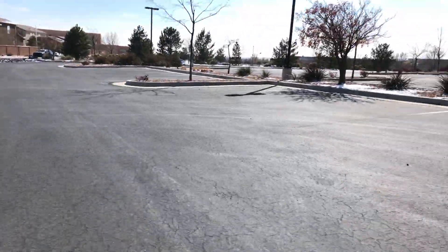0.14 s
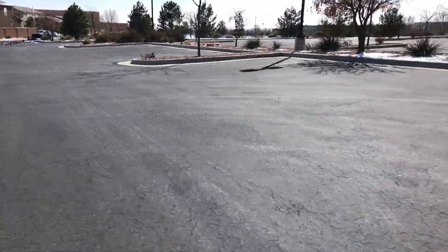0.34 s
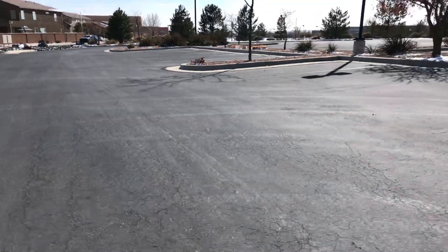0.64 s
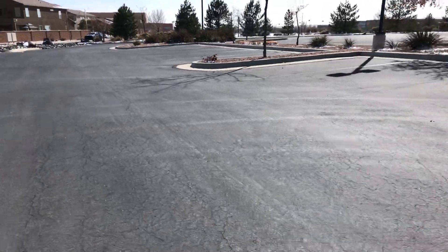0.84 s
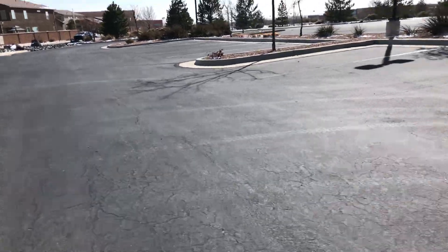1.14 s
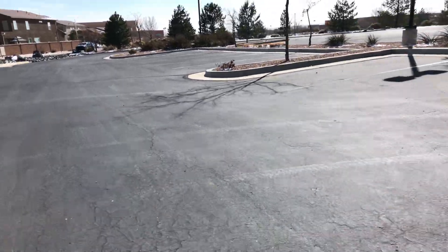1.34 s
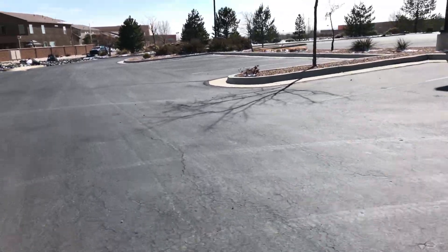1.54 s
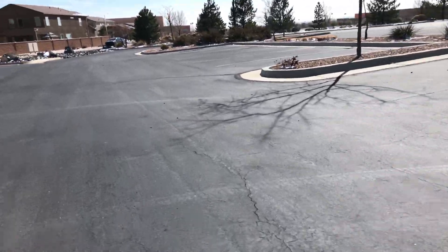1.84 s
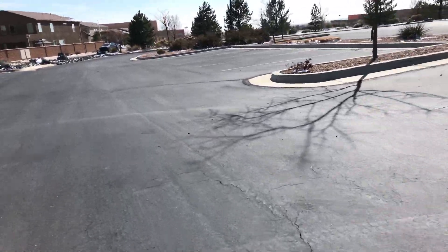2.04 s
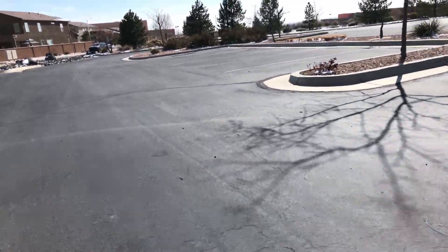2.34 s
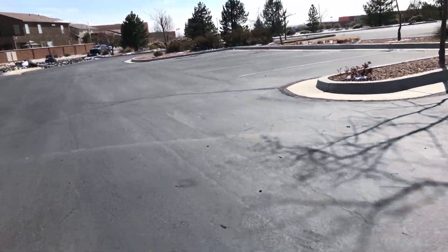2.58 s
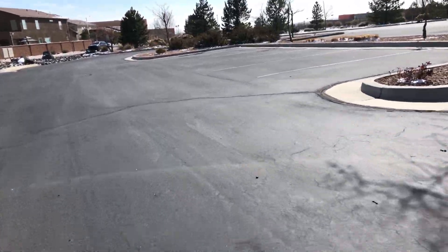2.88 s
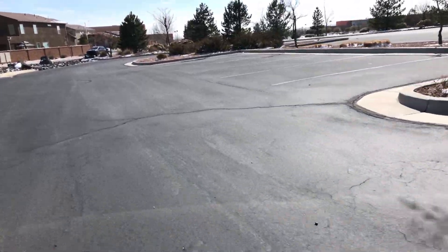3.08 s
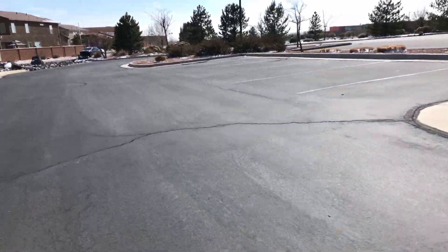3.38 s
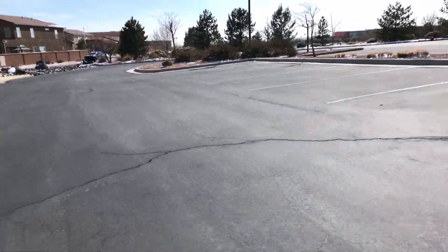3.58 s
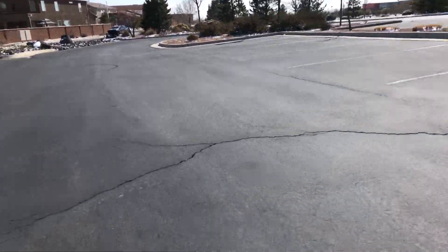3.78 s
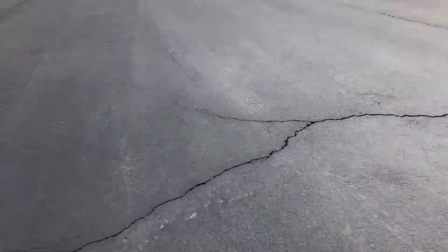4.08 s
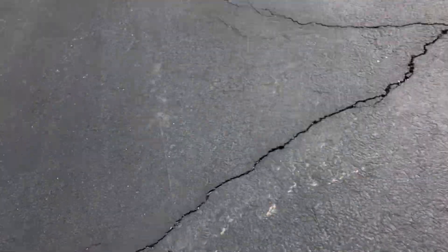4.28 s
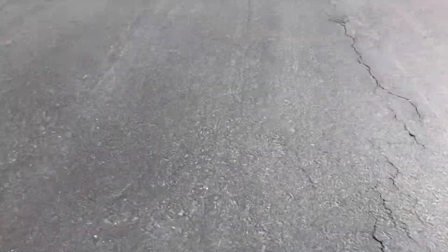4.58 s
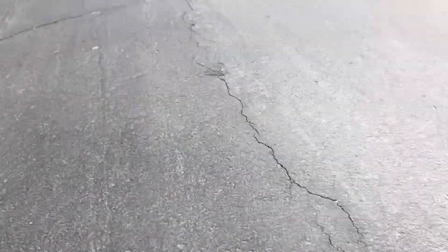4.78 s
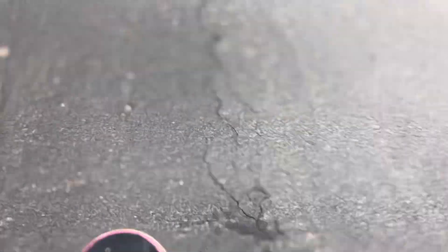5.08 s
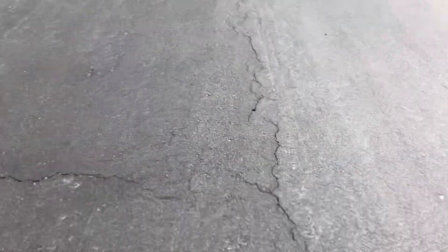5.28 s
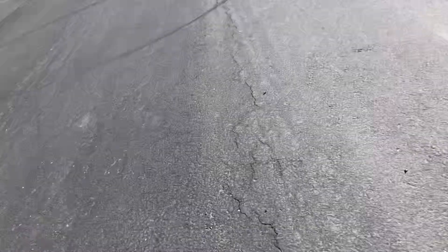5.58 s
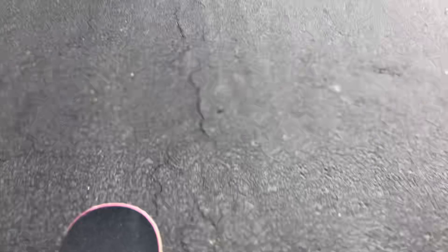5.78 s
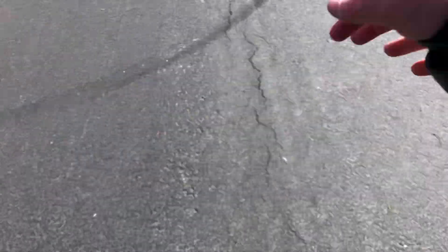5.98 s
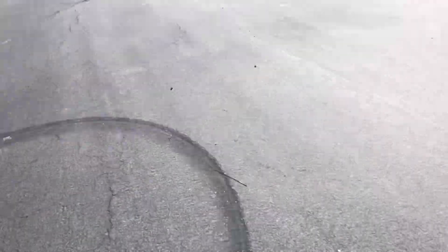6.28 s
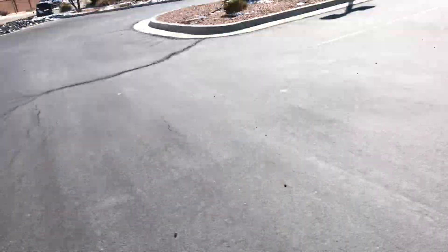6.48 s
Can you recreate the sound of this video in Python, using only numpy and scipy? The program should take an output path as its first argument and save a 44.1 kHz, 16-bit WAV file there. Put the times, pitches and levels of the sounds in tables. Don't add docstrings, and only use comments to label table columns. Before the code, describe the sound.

Skateboard wheels rumble continuously over coarse asphalt with a droning wooden deck, rattling trucks, crack knocks and wind buffeting, turning louder and brighter near four seconds.

```python
import sys
import numpy as np
from scipy import signal
from scipy.io import wavfile
from scipy.ndimage import uniform_filter1d, minimum_filter1d

SR = 44100
rng = np.random.default_rng(int(sys.argv[2]) if len(sys.argv) > 2 else 0)


def dump(signal):
    limited = np.clip(np.atleast_2d(signal).T, -1, 1)
    pcm = np.round(limited * 32767).astype(np.int16)
    wavfile.write(sys.argv[1], SR, pcm)


def attenuation_scalar(level_db):
    decades = np.asarray(level_db, float) / 20
    return 10 ** decades


N = 292383


def rms_one(x):
    return x / np.sqrt(np.mean(x ** 2) + 1e-20)


def in_time(rows):
    s, *columns = np.transpose(rows)
    return [np.interp(np.arange(N) / SR, s, c) for c in columns]


def humps(rows):
    t, out = np.arange(N) / SR, np.zeros((len(rows[0]) - 2, N))
    for s, length_s, *values in rows:
        near = slice(max(int((s - length_s / 2) * SR), 0), int((s + length_s / 2) * SR))
        out[:, near] += np.outer(values, np.cos(np.pi * (t[near] - s) / length_s) ** 2)
    return out


def drift(rate_hz):
    r = np.exp(-16 * np.pi * rate_hz / SR)
    slow = signal.lfilter([1], [1, -2 * r, r * r], rng.standard_normal(N // 8 + 4002))[4000:]
    return np.interp(np.arange(N) / 8, np.arange(len(slow)), rms_one(slow - slow.mean()))


def resonance(x, hz, width_hz, count=1):
    r = np.exp(-np.pi * width_hz / SR)
    top = (1 - r * r) / 2
    section = [top, 0, -top, 1, -2 * r * np.cos(2 * np.pi * hz / SR), r * r]
    return signal.sosfilt([section] * count, x)


def microphone_hiss():
    return attenuation_scalar(-70) * rng.standard_normal(N)


# middle in seconds, length in seconds, level in dB over calm air.
GUSTS = [(0.215, 0.063, 9), (0.369, 0.23, 14), (0.663, 0.082, 13), (0.998, 0.48, 8.5), (1.202, 0.24, 7),
         (1.437, 0.28, 9.5), (1.726, 0.44, 5), (1.946, 0.57, 8), (2.13, 0.24, 3.5), (2.285, 0.19, 7.5),
         (2.589, 0.2, 4), (3.417, 0.15, 5), (3.996, 0.039, 13.5), (4.21, 0.44, 11), (4.405, 0.12, 6.5),
         (4.605, 0.071, 12), (4.714, 0.45, 6), (4.814, 0.059, 10), (5.213, 0.26, 6), (5.498, 0.5, 12.5),
         (5.827, 0.085, 10.5), (5.892, 0.18, 9), (5.966, 0.13, 6), (6.151, 0.7, 9.5), (6.39, 0.09, 10.5),
         (6.585, 0.28, 10.5), (.33, 0.089, 4), (.4, 0.064, 0), (1.029, 0.056, 6.5), (1.962, 0.068, 8.5),
         (3.01, .06, 8.5), (4.13, 0.12, 5.5), (4.306, 0.025, 11.5), (5.243, 0.037, 10.5),
         (6.217, 0.056, 6.5), (6.584, 0.043, 9)]


def wind():
    wind_db = -36 + 1.146 * humps(GUSTS)[0]
    band = signal.butter(2, [50, 205], "band", fs=SR, output="sos")
    eddies = signal.sosfilt(band, rng.standard_normal(N))
    eddies = eddies / uniform_filter1d(eddies ** 2, size=2600) ** 0.6
    return rms_one(eddies) * attenuation_scalar(wind_db + 2.25 * drift(47.0))


def moving_band(rows, rest_db, from_s, width_hz, impacts, bounce):
    hz, = in_time([(s, hz) for s, _, hz, _ in rows])
    level_db = rest_db + humps(rows)[1]
    force = rms_one(impacts * rng.standard_normal((2, N))) + rng.standard_normal((2, N))
    slow = signal.sosfilt(signal.butter(3, width_hz, fs=SR, output="sos"), force)
    turn = 2 * np.pi * np.cumsum(hz) / SR
    band = rms_one(slow[0] * np.cos(turn) + slow[1] * np.sin(turn))
    fade_in = np.clip((np.arange(N) / SR - from_s) / 0.26, 0, 1)
    return fade_in * attenuation_scalar(level_db + 2.0 * bounce) * band


# middle in seconds, length in seconds, centre in Hz, level in dB over rest.
GLINTS = [
    (.08, .25, 10000, 6),
    (.28, .3, 11000, 8),
    (.43, 0.11, 12800, 7),
    (4.05, .5, 11500, -10),
    (4.45, .12, 12000, 9),
    (5.2, .14, 11500, 12),
    (5.84, .1, 11000, 16),
    (6.3, .3, 12000, 8),
]


def glints(road, bounce):
    return moving_band(GLINTS, -60.5, -.3, 1200, road, bounce)


# middle in seconds, length in seconds, ridge in Hz, level in dB over rest.
RIDGES = [(.22, .2, 7700, 18), (4.27, .1, 6520, 14), (4.46, .12, 6230, 17), (4.8, .3, 7000, 13),
          (5.2, .1, 6300, 16), (5.42, .25, 6180, 18), (5.65, 0.16, 7300, 15), (5.85, .1, 8250, 19),
          (6.07, 0.13, 8750, 15), (6.2, .1, 9000, 21), (6.33, .2, 6940, 19), (6.46, .12, 8850, 19)]


def thumb_ridges(road, bounce):
    return moving_band(RIDGES, -62, -.3, 300, road, bounce)


# middle in seconds, length in seconds, gap in Hz, level in dB over rest.
CHINKS = [(.36, .06, 3900, 13), (3.78, .12, 4300, 19), (3.88, .12, 4400, 8), (3.98, 0.16, 4500, 21),
          (4.2, 0.23, 4200, 23), (4.28, .08, 4400, 18), (4.42, 0.2, 4290, 21), (4.73, .04, 3350, 17),
          (4.9, 0.24, 3450, 27), (5.215, .04, 4900, 22), (5.23, .03, 4000, 24), (5.563, .03, 2420, 28),
          (5.76, .05, 4300, 29), (5.83, .07, 2900, 27), (6.03, 0.21, 4400, 22), (6.08, .04, 6100, 15),
          (6.36, .03, 2000, 20)]


def finger_gaps(road, bounce):
    return moving_band(CHINKS, -64, 0, 220, road, bounce)


HAND_LOW_S = 4.05

# middle in seconds, length in seconds, hollow in Hz, level in dB over rest.
CUPS = [(4.233, 0.089, 1960, 6), (4.38, .14, 1750, 15), (4.454, 0.13, 2103, 16), (4.66, 0.51, 2480, 12.5),
        (4.872, 0.19, 2577, 13.5), (5.029, 0.12, 1786, 11), (5.17, 0.29, 2090, 20.5),
        (5.504, 0.53, 2313, -1), (5.793, 0.088, 2036, 13), (5.843, 0.16, 2310, 18), (6.09, 0.22, 1994, 13),
        (6.5, 0.19, 2210, 11)]


def cupped_hand(road, bounce):
    return moving_band(CUPS, -49.5, HAND_LOW_S, 220, road, bounce)


# middle in seconds, length in seconds, whirr in Hz, level in dB over rest.
WHIRRS = [
    (4.37, 0.11, 1480, 18.5),
    (4.5, .08, 1380, 10),
    (4.93, .2, 1320, 15),
    (5.07, .12, 1504, 11),
    (5.67, 0.13, 1380, 16),
    (6.15, 0.4, 1096, 17),
]


def wheel_whirr(road, bounce):
    return moving_band(WHIRRS, -43, HAND_LOW_S, 90, road, .5 * bounce)


# middle in seconds, length in seconds, mode in Hz, level in dB over rest.
SINGING = [
    (4.9, .12, 600, 11),
    (5.63, .08, 638, 12),
    (5.7, .07, 559, 19),
    (5.795, .11, 581, 17),
    (5.9, .06, 332, 12),
]


def singing_deck(road, bounce):
    return moving_band(SINGING, -40, HAND_LOW_S, 25.0, road, .3 * bounce)


# start in seconds, peak in dB, centre in Hz.
JOLTS = [(0.1775, -19, 2320), (0.3586, -9, 2380), (0.7462, -12, 2360), (0.7911, -21, 4060),
         (1.5908, -14, 2310), (2.2678, -12, 2540), (2.4389, -22, 7700), (2.812, -9, 2420),
         (3.1847, -12, 2910), (4.2657, -19, 6150), (4.364, -4.5, 4860), (4.3949, -11, 4200),
         (4.445, 3, 4210), (4.5171, -4, 5160), (4.6728, -2, 4260), (4.7237, -5, 2750), (5.0315, 0, 2410),
         (5.1093, 0, 4400), (5.1522, 1, 2340), (5.248, -2, 4170), (5.5189, -14, 2270), (5.6491, 0, 4410),
         (5.696, -4, 4060), (5.7843, -21, 3184), (5.877, 3, 2640), (5.9638, -11.5, 4620),
         (5.9963, -2, 4550), (6.108, -2, 4370), (6.3609, -2, 6200), (6.3914, -17, 6060), (4.2193, -3, 2000),
         (4.331, -20, 1800), (4.4238, -11, 3000), (4.546, -17, 2000), (4.7062, -17, 2400),
         (4.8449, -13, 2590), (4.9392, 1, 3000), (5.0828, -3, 1800), (5.1981, 2, 2200), (5.5962, -13, 1800),
         (5.7518, -2, 1900), (5.9224, -5, 2580), (6.1943, -13, 3000), (6.2826, -13, 4310),
         (6.5914, -12, 1990)]
# start in seconds, peak in dB, ring in Hz, ring time in seconds.
SNAPS = [(0.7458, -7, 1490, 0.00072), (0.7473, -23, 3000, 0.00092), (5.034, -10.5, 1670, 0.0032),
         (5.1532, -9, 5800, 0.00068), (5.814, 4.5, 5800, 0.00037), (5.8139, -7, 11500, 0.00022),
         (5.814, -16, 14500, .0003), (5.8142, -6, 3200, 0.00058), (5.8795, -16, 4500, .0006),
         (5.036, -16, 4500, .0008), (5.826, -10, 2600, 0.0007), (5.842, -3, 2200, 0.0008),
         (5.8772, -3, 900, .0008), (5.249, -7, 1300, .001), (5.858, -10, 2180, 0.0012),
         (5.879, -13, 2480, 0.0011)]


def hardware_ticks(rattle_db):
    jolts = [*JOLTS, *small_jolts(rattle_db)]
    out, t = np.zeros(N), np.arange(1500) / SR
    noise = rng.standard_normal((len(jolts), len(t)))
    swell = t / 0.0051 * np.exp(1 - t / 0.0022)
    for (s, peak_db, hz), hiss in zip(jolts, noise):
        burst = rms_one(resonance(resonance(hiss, hz, 0.4 * hz), hz, 5.1 * hz)) * swell
        i = round(s * SR)
        out[i:i + len(t)] += (attenuation_scalar(peak_db - 21.0) * burst)[:N - i]
    for s, peak_db, hz, ring_s in SNAPS:
        i = round(s * SR)
        envelope = np.exp(-t / ring_s) * (1 - np.exp(-t / 0.00037))
        out[i:i + len(t)] += attenuation_scalar(peak_db) * np.sin(2 * np.pi * hz * t) * envelope
    return out


def small_jolts(rattle_db, count=30):
    loose_parts_hz = [2400, 3000, 4300, 6200]
    when, size, part = rng.random((count, 3)).T
    s = (np.arange(count) + when) / count * (N - 2000) / SR
    db = rattle_db[(s * SR).astype(int)] + 18 + 6 * (2 * size - 1)
    hz = np.take(loose_parts_hz, (part * len(loose_parts_hz)).astype(int))
    return list(zip(s, db, hz))


# peak time in seconds, peak in dB, ring in Hz, length in seconds.
KNOCKS = [(0.072, -12, 506, 0.0058), (0.151, -5, 565, 0.008), (0.291, -5, 590, 0.01),
          (0.393, -7, 490, 0.0075), (0.474, -7, 536, 0.0053), (1.652, -7, 690, 0.0052),
          (1.783, -11.0, 584, 0.0059), (1.801, -8, 570, 0.0056), (4.285, -8, 505, 0.0072),
          (4.406, -4.5, 533, 0.0067), (4.424, -10, 530, 0.0061), (4.466, -6, 608, 0.0151),
          (4.495, -4, 560, 0.0037), (4.54, -3, 553, 0.01), (4.568, -4.5, 615, 0.0083),
          (4.583, -5.5, 524, 0.004), (4.789, -7, 543, 0.0089), (4.859, -6, 590, 0.0062),
          (4.888, -9, 640, 0.0153), (4.922, -5.5, 598, 0.0088), (4.989, -0.5, 550, 0.0047),
          (5.038, -3, 550, 0.0078), (5.135, -1.5, 590, 0.0084), (5.15, -17, 613, 0.0084),
          (5.228, -10, 590, 0.0081), (5.258, 2, 565, 0.0054), (5.279, -5, 580, 0.0048),
          (5.474, -5.5, 615, 0.0047), (5.5, -3, 632, 0.0059), (5.566, -3.5, 507, 0.0062),
          (5.605, -7, 560, 0.0078), (5.654, 2, 624, 0.0055), (5.689, -5.5, 562, 0.012),
          (5.712, -3.5, 515, 0.0107), (5.763, -4, 568, 0.0092), (5.811, -2, 590, 0.0102),
          (5.883, -6, 550, 0.007), (5.918, -0.5, 550, 0.0082), (5.941, -3, 605, 0.005),
          (5.966, -5.5, 571, 0.0141), (5.998, -1, 526, 0.0041), (6.008, -2.5, 491, 0.013),
          (6.243, -4, 540, 0.0092), (6.269, -9, 560, 0.0093), (6.283, -3, 544, 0.0079),
          (6.461, -7, 614, 0.0055), (6.474, -4, 484, 0.0062), (6.553, -6.5, 714, 0.0098),
          (6.593, -4, 490, 0.0047), (6.622, -3, 550, 0.0033)]
MORE_KNOCKS = [(0.228, -12, 496, 0.0078), (0.711, -7, 665, 0.0048), (0.744, -7, 636, 0.0039),
               (0.878, -18, 560, 0.0064), (0.938, -18, 605, 0.0078), (1.369, -11, 595, 0.0064),
               (1.722, -10, 780, 0.013), (2.137, -8, 650, 0.0062), (2.511, -8, 687, 0.0074),
               (2.607, -7, 693, 0.0067), (3.608, -19, 503, 0.0044), (3.755, -11, 450, 0.0053),
               (4.27, -19, 1033, .01), (4.737, -12, 530, 0.0059), (5.28, -7, 330, 0.0098),
               (5.322, -4, 350, 0.0045), (5.584, -4, 327, 0.0064), (5.624, -9, 890, .01),
               (5.826, -13, 300, 0.0043), (5.883, -6, 310, 0.0096), (5.901, -3, 332, 0.0071),
               (5.933, -2.5, 302, 0.0046), (6.37, -9, 313, 0.017)]


def knocks():
    out, t = np.zeros(N + 3000), np.arange(3000) / SR
    for s, peak_db, hz, length_s in [*KNOCKS, *MORE_KNOCKS]:
        rise_s = 0.00222 + 0.381 * length_s
        i = round((s - rise_s) * SR)
        envelope = (t / rise_s * np.exp(1 - t / rise_s)) ** 2.65
        out[i:i + len(t)] += attenuation_scalar(peak_db - 4.0) * envelope * np.sin(2 * np.pi * hz * t)
    return out[:N]


# middle in seconds, length in
# seconds, drone change in dB.
HOPS = [(.607, 0.023, -6), (.768, 0.013, -7), (2.598, 0.016, 3), (4.316, 0.023, -4), (4.667, 0.024, 1.5),
        (4.772, 0.025, -6), (4.872, 0.017, -6), (5.07, 0.03, -7), (5.178, 0.022, -1), (5.555, .02, -2),
        (5.738, 0.058, -7)]


def unloading():
    t, dip_db = np.arange(N) / SR, humps(HOPS)[0]
    for s, _, _, length_s in [*KNOCKS, *MORE_KNOCKS]:
        near = slice(max(round((s - .04) * SR), 0), round((s + .04) * SR))
        hang_s = 0.0024 + 0.65 * length_s
        dip_db[near] -= 1 * np.exp(-((t[near] - s + 0.0033) / hang_s) ** 2)
    return attenuation_scalar(dip_db)


def stones(per_s, spread_db):
    sizes = attenuation_scalar(spread_db * np.minimum(rng.exponential(1, N), 5))
    return sizes * (rng.random(N) < per_s / SR) + 1e-18


def bouncing():
    return rms_one(0.74 * drift(3.1) + 0.5 * drift(38.0) + 1.86 * drift(106.0))


# time in seconds, load in dB, coarseness in dB.
ROLL = [(0, -13.5, 3.5), (.4, -14.5, 2), (.5, -16, -0.5), (1.5, -16, 2), (2.2, -17, -1.5), (3.6, -18, -2.5),
        (4.04, -19.5, 3.5), (4.26, -13.5, 4), (4.36, -19, 7.5), (4.54, -10.5, 6), (4.66, -17.5, 8),
        (4.92, -11.5, 6), (5.07, -12.5, 7), (5.23, -12.5, 6), (5.38, -15.5, 6.5), (5.6, -13, 4.5),
        (6.0, -12.5, 9.5), (6.63, -13, 4.5)]
# middle in seconds, length in seconds, scuff
# change in dB, rattle change in dB.
SWELLS = [(.01, 0.025, -2, -6), (.509, 0.1, 2.5, 0.5), (.988, 0.32, 2.5, 0), (1.636, 0.41, 2, -1.7),
          (1.78, 0.036, 4.5, 0), (2.0, 0.023, 8, 4), (2.449, 0.13, 4, 5), (2.923, 0.09, -2, -2),
          (2.99, 0.021, 5, 5), (3.45, 0.042, -2, 6.5), (3.7, 0.13, -4, -4), (3.786, 0.11, 4.5, 0),
          (4.0, 0.12, 3, -0.5), (4.26, 0.14, 0.5, 5), (4.34, 0.2, 6, -3.5), (4.535, 0.18, -8, -0.5),
          (4.61, .03, -7, 0), (5.104, 0.017, -6, -4), (4.729, 0.081, 0.5, 5.5), (4.819, 0.082, -2, -2),
          (5.02, 0.22, -3, -4), (5.162, 0.07, 1.5, 6), (5.222, 0.068, 1.5, 7.5), (5.173, 0.019, -5, -4),
          (5.245, .02, -9, -9), (5.65, 0.067, 2, 2), (5.736, 0.021, -5, -7), (5.776, 0.022, 1, -7),
          (5.845, 0.15, 4, 2), (5.897, 0.02, 6, 2), (6.06, 0.059, 1.5, 2.5), (6.17, 0.062, -6, -3),
          (6.3, 0.083, 0.5, 3), (6.5, .06, -2.5, -1)]


def road_levels():
    load_db, coarse_db = in_time(ROLL)
    load_db = load_db + 16
    scuffed_db, shaken_db = humps(SWELLS)
    deck_db = -16 + load_db + 0.39 * scuffed_db + 0.25 * shaken_db
    scuff_db = -29 + 1.32 * load_db + 0.27 * coarse_db + scuffed_db
    rattle_db = -40 + 0.76 * load_db + coarse_db + shaken_db
    return deck_db, scuff_db, rattle_db


# time in seconds, pose (0 raised, 1 ahead, 2 down, 3 at the board's nose, 4 turned aside).
AIM = [(0, 0.058), (.4, 0.45), (.65, 1.1), (2, 1.08), (3.6, 1.24), (3.9, 1.25), (4.1, 1.36), (4.3, 1.9),
       (4.6, 2.0), (4.82, 2.06), (5.0, 2.24), (5.25, 2.32), (5.58, 2.34), (5.68, 2.2), (5.8, 2.26),
       (5.87, 3.5), (6.1, 3.98), (6.63, 3.43)]


def phone_aim():
    return in_time(AIM)[0]


def body(modes, impacts, bounce_db, aim, grit, patchy_db, flicker_db):
    out, power = 0, 0
    for hz, width_hz, *pose_db in modes:
        force = rms_one(impacts * rng.standard_normal(N)) + grit * rng.standard_normal(N)
        felt_db = bounce_db / (1 + (hz / 14500) ** 2)
        ringing = resonance(force * attenuation_scalar(felt_db), hz, 1.83 * width_hz, count=3)
        gain = attenuation_scalar(np.interp(aim, range(len(pose_db)), pose_db)) * np.sqrt(width_hz)
        wander = patchy_db * (1 + 0.2 * aim) * drift(3.2) + flicker_db * drift(34.0)
        out = out + gain * attenuation_scalar(wander) * rms_one(ringing)
        power = power + gain ** 2
    return out / np.sqrt(power)


# pitch in Hz, width in Hz, then level in dB per Hz in poses 0, 1, 2, 3 and 4.
TRUCKS = [(2900, 360, -3, 3, -3.5, 1, -10), (3360, 270, 0, -9.5, 2, -9, -9),
          (3975, 650, 1, 2.5, -2, -2, -5), (4430, 670, -9, 1.5, -2, -5.5, -1),
          (5310, 650, -14, -6.5, -7, -1, -14), (6150, 550, -9, 3.5, -3, -9.5, -2.5),
          (7230, 1600, -18, -0.5, -6, -4.5, -10.5), (7880, 1200, 1.5, -2.5, -21, -3, -28),
          (8860, 1400, -10, -4.5, -8, -9, -8.5), (10000, 2000, -13, -1.5, -26, -25, -27),
          (12000, 3900, -19, -17.5, -20.5, -19, -23), (15300, 1300, -23, -12.5, -21, -25, -22)]


def truck_rattle(level_db, road, bounce, aim):
    rattle = body(TRUCKS, road, 2.25 * bounce, aim, grit=0.74, patchy_db=-0.15, flicker_db=1.38)
    rattle = attenuation_scalar(level_db - 2.5) * rattle
    return rattle - 0.32 * resonance(rattle, hz=5340, width_hz=320)


# time in seconds, extra path in mm, strength from 0 to 1.
FINGERS = [(0, 87, 0.43), (.45, 83, 0.05), (.7, 63, 0.16), (3.9, 57, 0.2), (4.2, 77, 0.15),
           (4.45, 105, 0.2), (5.2, 89, 0.02), (5.5, 75, 0.1), (5.8, 79, 0.05), (6.1, 70, 0.23),
           (6.4, 81, 0.27), (6.63, 68, 0.2)]


def finger_echo(x):
    path_mm, strength = in_time(FINGERS)
    delay_s = path_mm / 343000
    moments = np.arange(0, 2 * N, 2) - 2 * delay_s * SR
    late = np.interp(moments, np.arange(2 * N), signal.resample_poly(x, 2, 1))
    return (x - strength * late) / np.sqrt(1 + strength ** 2)


# pitch in Hz, width in Hz, then level in dB per Hz in poses 0, 1, 2, 3 and 4.
WHEELS = [
    (1253, 198, -2, 14.5, 14, -1.5, -1),
    (1438, 350, -4.5, 5.5, 7.5, -6.5, -9),
    (1750.0, 390, -21, -9, 1.5, -21, -22),
    (2150, 440, -16.5, -4, -1, -15, -20.5),
    (2480.0, 190, -33, -12, -2, -28, -22),
]


def wheel_scuff(level_db, road, bounce, aim):
    scuff = body(WHEELS, road, 1.6 * bounce, aim, grit=0.61, patchy_db=0.66, flicker_db=1.5)
    return attenuation_scalar(level_db - 4.0) * scuff


# pitch in Hz, width in Hz, then level in dB per Hz in poses 0, 1, 2, 3 and 4.
DECK = [
    (186.3, 117, -2, -2, -9, -11.5, -4.5),
    (296, 69, -1.5, -1.5, -2.5, -6, 5),
    (407, 74, -11, -26, -7.5, -7.5, -0.5),
    (472.8, 110, 0.5, -2.5, -1, -6.5, 2.5),
    (543.4, 101, -5, -4, -6, -9, 0.5),
    (610, 99, -2.5, -4, -1.5, 2, -1),
    (704, 94, -9.5, -0.5, -11.5, -3.5, -6),
    (835, 125, -5.5, -3, -17.5, -2.5, -6.5),
    (1017, 185, -8, -10, -18, -5.5, -15),
]


def deck_drone(level_db, road, bounce, aim):
    drone = body(DECK, road, 2.2 * bounce, aim, grit=1.12, patchy_db=0.8, flicker_db=0.75)
    drone = rms_one(drone / (uniform_filter1d(drone ** 2, size=500) + 1e-9) ** 0.27)
    return attenuation_scalar(level_db - 1.5) * unloading() * drone


# middle in seconds, length in seconds, depth from 0 to 1.
SHADOWS = [
    (4.35, 0.16, 0.7),
    (4.55, 0.17, 0.5),
    (4.72, 0.22, 0.64),
    (4.82, .08, 0.4),
    (5.05, 0.1, 0.5),
    (5.37, 0.15, 1),
    (5.72, 0.093, 0.7),
]


def leg_shadow(x):
    return x - np.clip(humps(SHADOWS)[0], 0, 1) * resonance(x, hz=860, width_hz=330)


# time in seconds, missing pitch in Hz, depth from 0 to 1.
EDGE = [
    (.45, 11400, 0.1),
    (.8, 11400, .5),
    (4.1, 11400, .5),
    (4.3, 6940, 0.4),
    (5.0, 7300, 0.4),
    (5.4, 8250, .5),
    (5.65, 9700, 0.3),
    (5.9, 6900, 0.2),
    (6.2, 7400, 0.44),
    (6.55, 8400, 0.3),
]


def edge_notch(x):
    hz, depth = in_time(EDGE)
    trembling_hz = hz * (1 + .035 * drift(6.0))
    turn = np.exp(2j * np.pi * np.cumsum(trembling_hz) / SR)
    band = signal.lfilter(*signal.butter(1, 520, fs=SR), x / turn) * turn
    return x - 2 * np.clip(depth, 0, 1) * band.real


def scene():
    deck_db, scuff_db, rattle_db = road_levels()
    aim, bounce = phone_aim(), bouncing()
    road = stones(per_s=2500., spread_db=2.5)
    air = wind() + microphone_hiss()
    hand = cupped_hand(road, bounce) + finger_gaps(road, bounce)
    hand = hand + glints(road, bounce) + thumb_ridges(road, bounce)
    tones = singing_deck(road, bounce) + wheel_whirr(road, bounce)
    strikes = hardware_ticks(rattle_db) + knocks()
    rattle = finger_echo(truck_rattle(rattle_db, road, bounce, aim))
    board = deck_drone(deck_db, road, bounce, aim) + wheel_scuff(scuff_db, road, bounce, aim)
    return edge_notch(air + hand + tones + strikes + rattle + leg_shadow(board))[None]


def limiter(x):
    gain = minimum_filter1d(np.minimum(1, .9 / (np.abs(x) + 1e-9)), size=201)
    return x * uniform_filter1d(gain, size=101)


def low_pass(x):
    return signal.sosfilt(signal.butter(12, 15700, fs=SR, output="sos"), x)


def record(dry):
    bass_cut = signal.butter(3, 50, "high", fs=SR, output="sos")
    top_cut = signal.cheby2(10, 60, 16750, fs=SR, output="sos")
    mix = limiter(signal.sosfilt(np.vstack([bass_cut, top_cut]), dry))
    return low_pass(mix)


dry = scene()
out = record(dry)
dump(out)
```